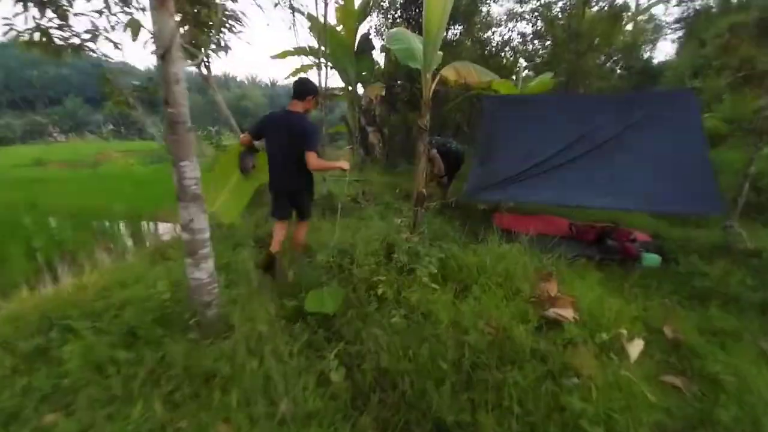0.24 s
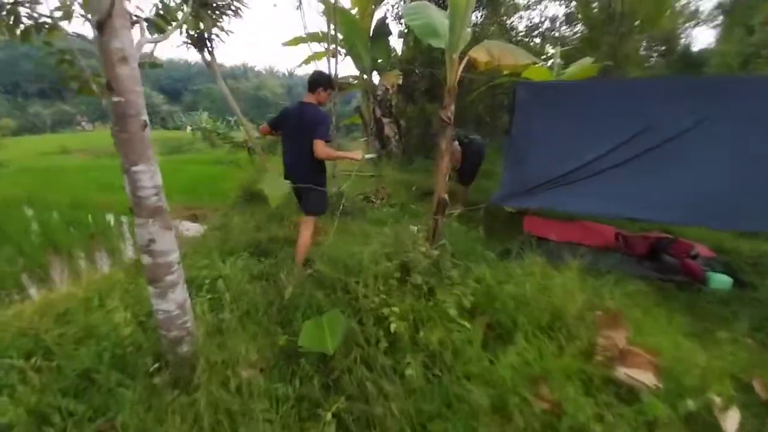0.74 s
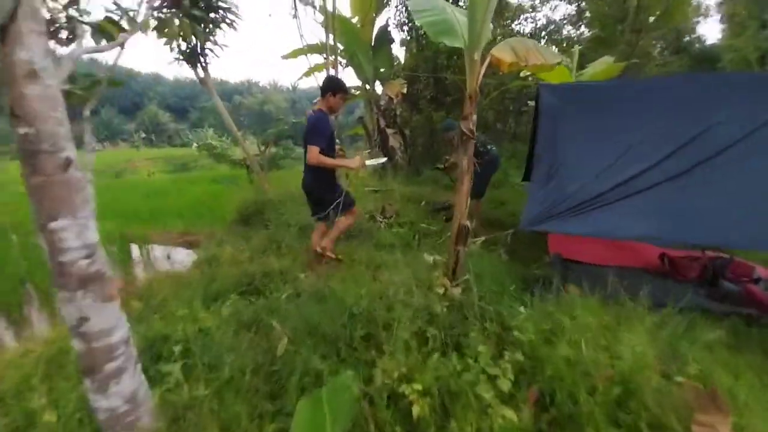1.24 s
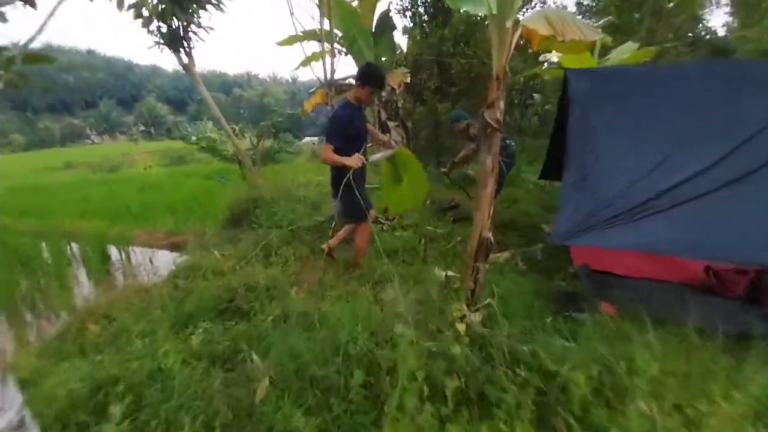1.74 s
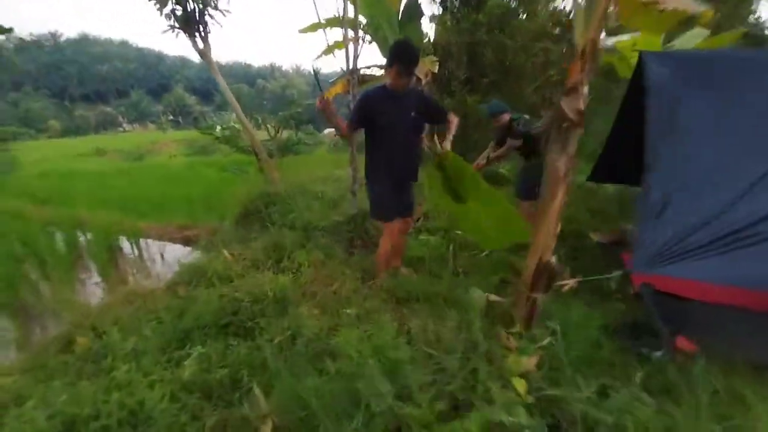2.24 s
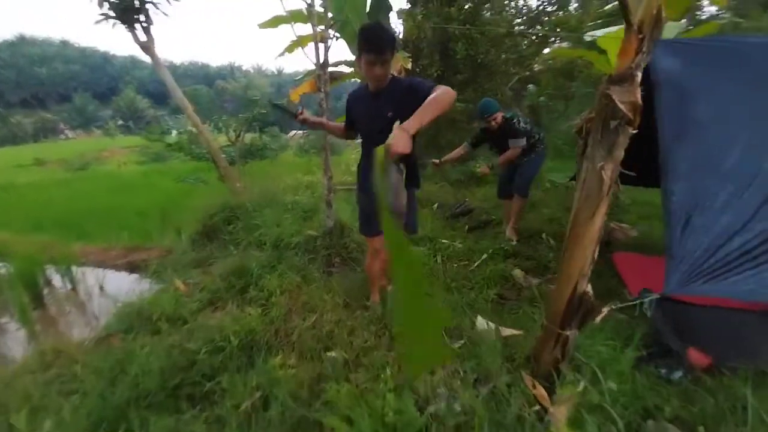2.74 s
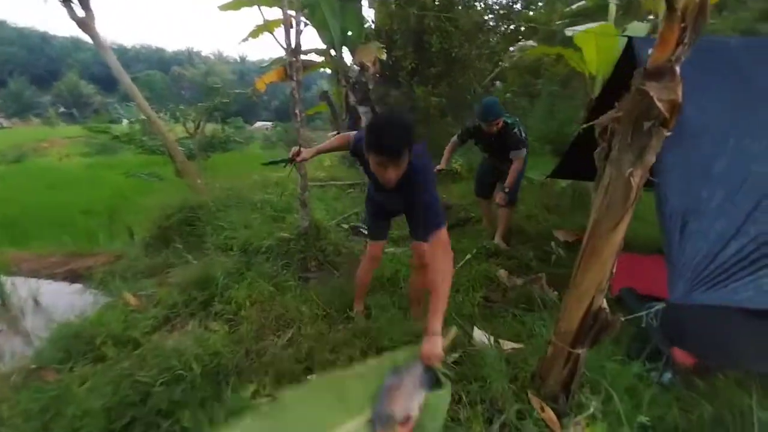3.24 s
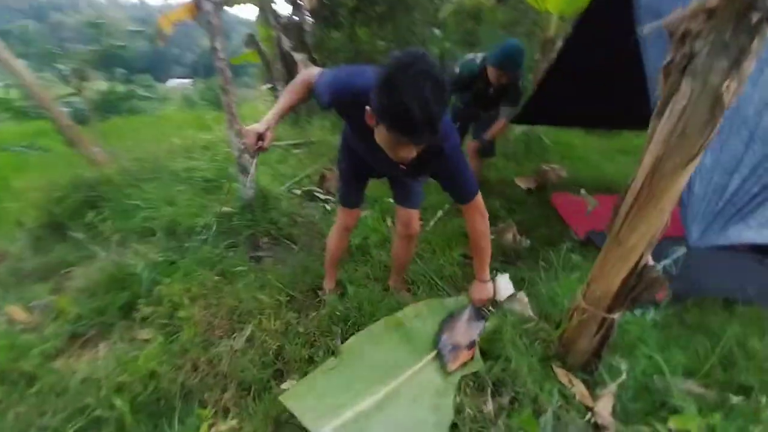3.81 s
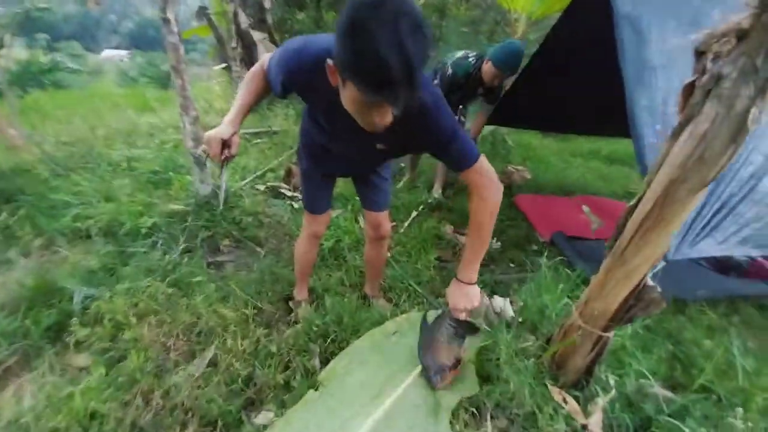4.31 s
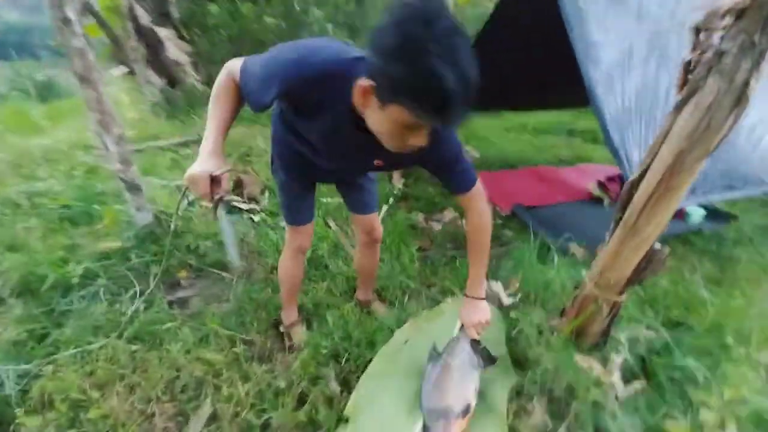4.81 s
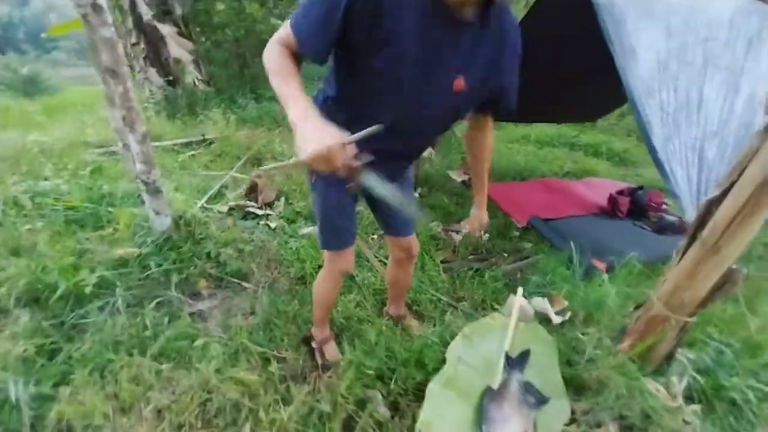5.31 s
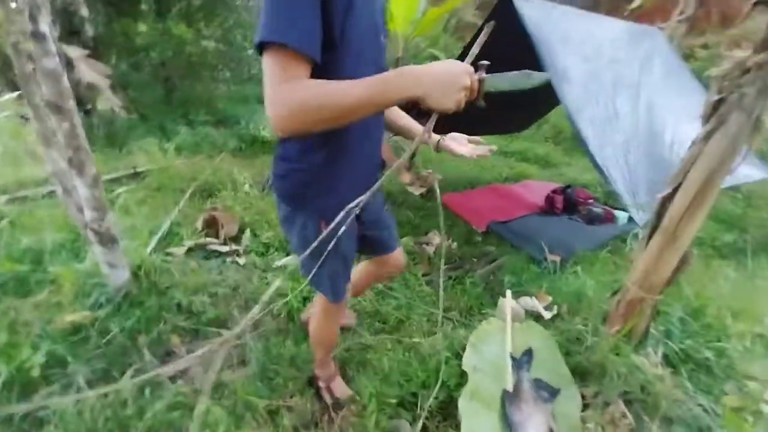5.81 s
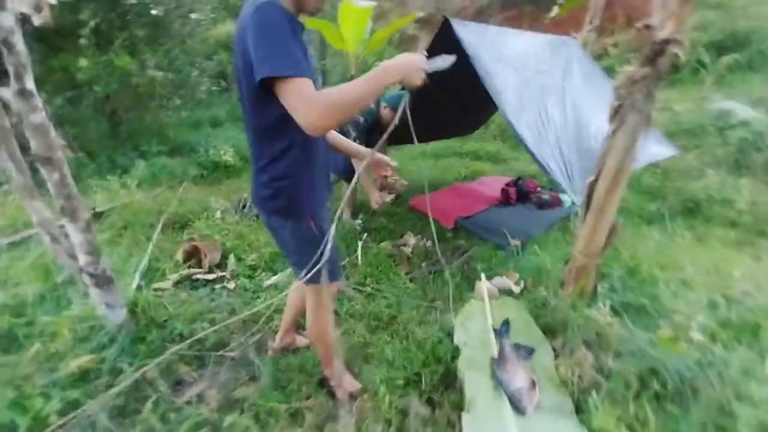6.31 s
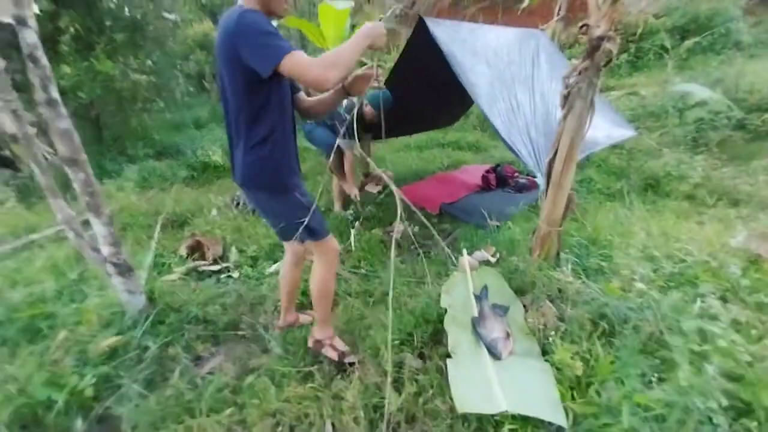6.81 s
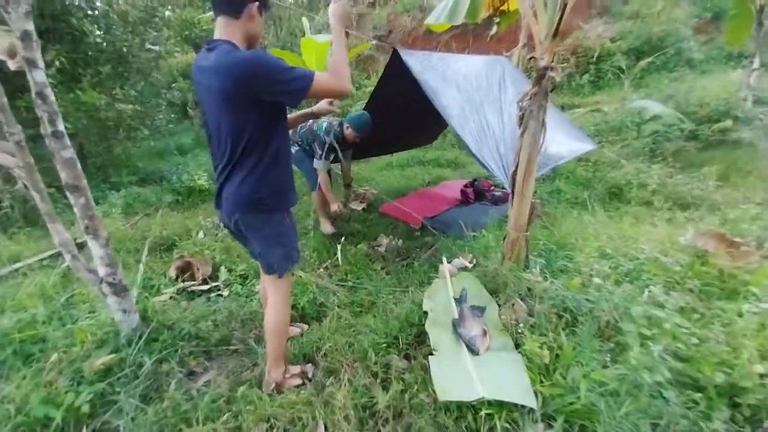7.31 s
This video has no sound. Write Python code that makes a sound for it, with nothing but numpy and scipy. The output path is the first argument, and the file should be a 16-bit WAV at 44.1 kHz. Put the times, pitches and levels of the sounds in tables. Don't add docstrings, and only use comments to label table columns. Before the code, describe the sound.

Bright grassy rustling and soft footfalls outdoors, crisp blade chops, a heavy leafy thud with scraping and snapping, over a quiet low valley hum.

```python
import sys
import numpy as np
from scipy import signal
from scipy.fft import rfft, irfft, next_fast_len
from scipy.io import wavfile
from scipy.ndimage import uniform_filter1d

SR = 44100
rng = np.random.default_rng(int(sys.argv[2]) if len(sys.argv) > 2 else 0)


def store_wav(level_fs):
    pcm = np.round(np.clip(np.atleast_2d(level_fs), -1, 1) * 32767)
    wavfile.write(sys.argv[1], SR, pcm.T.astype(np.int16))


def ratio(d):
    e = np.asarray(d, float) / 20
    return 10 ** e


N = 333032

# (frequency [Hz], likeness [-1 to 1])
LIKENESS = [(60, 0.35), (130, 0.8), (290, 0.058), (640, -0.45), (1410, 0.55), (3100, -0.044),
            (6820, -0.029), (15000, 0.035)]
# (frequency [Hz], likeness [-1 to 1])
NEAR_LIKENESS = [(60, .9), (250, .98), (600, .96), (1200, .8), (3000, .55), (8000, .3), (15000, .2)]


def rms_one(x):
    return x / np.sqrt(np.mean(x ** 2) + 1e-20)


def in_time(rows):
    s, *columns = np.transpose(rows)
    return [np.interp(np.arange(N) / SR, s, c) for c in columns]


def at_hz(points, hz):
    points = np.array(points)
    return np.interp(np.log(hz), np.log(points[:, 0]), points[:, 1])


def drift(rate):
    step = 40
    r = np.exp(-2 * np.pi * step * rate / SR)
    draws = rng.standard_normal(N // step + 2002)
    slow = signal.lfilter([1], [1, -2 * r, r * r], draws)[2000:]
    return np.interp(np.arange(N) / step, np.arange(len(slow)), rms_one(slow))


def coloured(x, spectrum):
    size = next_fast_len(x.shape[-1] + 4096, real=True)
    log_gain = np.log(ratio(at_hz(spectrum, np.fft.rfftfreq(size, 1 / SR) + 1)))
    cepstrum = irfft(log_gain, size)
    cepstrum[1:size // 2] *= 2
    cepstrum[size // 2 + 1:] = 0
    response = np.exp(rfft(cepstrum))
    return irfft(rfft(x, size) * response, size)[..., :x.shape[-1]]


def to_ears(mid_side, likeness, lag_ms=0):
    # (frequency [Hz], left minus right [dB])
    tilt = [(60, -0.5), (240, -2.5), (950, -2.5), (3770, -0.5), (15000, -1.5)]
    size = next_fast_len(mid_side.shape[1], real=True)
    hz = np.fft.rfftfreq(size, 1 / SR) + 1
    alike = np.clip(at_hz(likeness, hz), -.95, .98)
    mid, side = rfft(mid_side, size)
    both = np.sqrt(1 + alike) * mid + np.sqrt(1 - alike) * side * [[1], [-1]]
    both = both * np.exp(-1j * np.pi * hz * lag_ms / 1000 * [[1], [-1]])
    both = both * ratio(at_hz(tilt, hz) * [[.5], [-.5]])
    return irfft(both, size)[:, :mid_side.shape[1]]


def rustle(spectrum, per_s, spread_db, share, patchy_db, flicker, likeness=LIKENESS):
    born = rng.random(N) < per_s * ratio(5 * drift(12)) / SR
    sizes = ratio(spread_db * np.minimum(rng.exponential(1, N), 4))
    grains = rms_one(signal.lfilter([1], [1, -.9], born * sizes))
    share = np.clip(share, 0, 1)
    gate = np.sqrt(1 - share + share * grains ** 2) * ratio(patchy_db * drift(flicker))
    noise = gate * rng.standard_normal((2, N))
    return rms_one(to_ears(coloured(noise, spectrum), likeness))


def add(out, s, sound, pan_db=0):
    at = round(s * SR)
    panned = sound * ratio([[pan_db / 2], [-pan_db / 2]])
    out[:, at:at + sound.shape[-1]] += panned[:, :N - at]


def near_noise(s, size):
    # (time [s], left lag [ms], left minus right [dB])
    worker = [(0, 0.091, 3.5), (2.1, 0.051, -3), (2.7, 0.12, 1), (4.8, -0.041, -4), (5.7, -0.064, -2),
              (7.55, -0.056, -1)]
    when, lag_ms, pan_db = np.transpose(worker)
    pan = ratio(np.interp(s, when, pan_db) * np.array([[.5], [-.5]]))
    return pan * to_ears(rng.standard_normal((2, size)), NEAR_LIKENESS, np.interp(s, when, lag_ms))


def band_round(hz, octaves):
    edges = np.clip(hz * 2 ** (octaves * np.array([-.5, .5])), 100, 15500)
    return signal.butter(2, edges, "band", fs=SR, output="sos")


def swells(rows):
    drop_db, roundness = 12, 1.54
    t, power = np.arange(0, N + 64, 64) / SR, 0
    for s, level_db, rise, fall in rows:
        gone = np.abs(t - s) / np.maximum(np.where(t < s, rise, fall), .005)
        power = power + ratio(2 * (level_db - drop_db * gone ** roundness))
    return np.interp(np.arange(N) / SR, t, power)


def valley_hum():
    # (frequency [Hz], density [dB per Hz])
    ground = [(38, -38.5), (65, 2), (123, 0), (172, -2), (217, -2), (238, -8), (291, -11.5), (350, -16.5),
              (460, -27), (770, -120)]
    # (time [s], level [dB])
    hum_levels = [(0, -46), (1.1, -46.5), (1.62, -53.5), (1.91, -44.5), (2.6, -49), (3.2, -51), (3.5, -39),
                  (3.76, -39), (4.29, -47.5), (4.9, -46.5), (5.13, -39), (5.3, -44.5), (7.1, -46.5),
                  (7.55, -50.5)]
    drone = rustle(ground, per_s=16, spread_db=-2.5, share=0.017, patchy_db=1.07, flicker=5,
                   likeness=NEAR_LIKENESS)
    return ratio(in_time(hum_levels)[0]) * drone


def wind():
    # (frequency [Hz], density [dB per Hz])
    flutter = [(13, -38), (22, -19), (48, -17), (75, -21), (98, -24), (160, -120)]
    # (time of peak [s], level [dB], rise [s], fall [s])
    gusts = [
        (.4, -49, .4, .25),
        (1.06, -42, 0.2, 0.38),
        (1.8, -49.5, 0.29, .9),
        (3.5, -52, .45, .5),
        (4.6, -56.5, .45, 0.44),
        (5.28, -55, .3, 1.3),
    ]
    calm_db = -61
    gain = np.sqrt(swells(gusts) + ratio(2 * calm_db))
    return gain * rustle(flutter, per_s=34, spread_db=-15.0, share=.05, patchy_db=1.0, flicker=4.3)


def engine():
    # (time [s], fifth exhaust order [Hz], level [dB])
    engine_course = [(1.5, 216, -68), (1.7, 215, -53.5), (2.5, 200, -56), (2.9, 220, -57.5),
                     (3.2, 222, -72), (4.1, 194, -89), (4.5, 191, -42.5), (4.8, 189, -47.5),
                     (5.3, 183, -47), (5.6, 206, -49.5), (5.75, 180, -60), (6.0, 187, -49), (6.4, 193, -58),
                     (6.75, 187, -58), (7.0, 165, -43), (7.2, 158, -50.5), (7.55, 190, -50)]
    # (multiple of the firing rate, level against the fifth [dB])
    orders = [(5, -0.5), (4, -15), (3, -10), (2, -17)]
    hz, level_db = in_time(engine_course)
    firing = 2 * np.pi * np.cumsum(hz / 5 * (1 + .008 * drift(6))) / SR
    out = np.zeros((2, N))
    for k, db in orders:
        out += ratio(level_db + db + 4.5 * drift(5.1)) * np.sin(round(k) * firing + np.array([[.3], [-.3]]))
    return out


def crickets():
    # (start [s], length [s], level [dB])
    chirps = [
        (.39, .07, -68),
        (.58, .1, -67),
        (1.12, .07, -66),
        (1.34, .1, -66),
        (4.0, .1, -63),
        (4.21, .1, -65),
        (4.665, .105, -66),
        (5.165, .105, -63),
    ]
    # (time [s], level [dB])
    trill = [(0, -64), (.6, -55), (1.4, -61), (3.2, -58), (4.8, -68), (5.5, -78), (7.55, -78)]
    strokes_per_s, stroke_hz = 29, (4950, 4350)
    trill_hz, trill_per_s = 6850, 14
    sides = np.array([[.6], [-.6]])
    out, t = np.zeros((2, N)), np.arange(N) / SR
    for s, length, level_db in chirps:
        stroke = np.arange(round(length * SR)) / SR * strokes_per_s % 1
        phase = 2 * np.pi * np.cumsum(np.interp(stroke, [0, 1], stroke_hz)) / SR
        rough = uniform_filter1d(rng.standard_normal((2, len(stroke))), size=60) * np.sqrt(60)
        rasp = 1 + 0.85 * rough
        add(out, s, ratio(level_db + 6.0) * rasp * np.sin(np.pi * stroke) * np.sin(phase + sides))
    throb = np.maximum(np.sin(2 * np.pi * trill_per_s * t - 0.2), 0)
    phase = 2 * np.pi * np.cumsum(trill_hz + 45 * drift(78)) / SR
    return out + ratio(in_time(trill)[0] - 2.0) * throb * np.sin(phase + sides)


def wading():
    # (time of peak [s], blade
    # hiss [dB], stalks against hiss [dB], rise [s], fall [s])
    leg_sweeps = [(.07, -42, -12, 0.15, 0.09), (.24, -42, -8.5, 0.13, 0.2), (.36, -45.5, -5, 0.11, 0.066),
                  (.78, -44, -9.5, .13, 0.19), (.99, -34, -10, 0.076, .14), (1.53, -47.5, -9.5, 0.098, 0.053),
                  (1.71, -41.5, -6.5, .08, 0.16), (1.82, -45.5, -5.5, 0.084, 0.13),
                  (2.05, -45.5, -28, 0.067, 0.31), (2.295, -50.5, -8, 0.064, .06), (2.5, -37.5, -8, .12, 0.13),
                  (2.72, -47, -10.5, 0.094, 0.38), (3.21, -46.5, -11.5, 0.12, 0.086),
                  (4.41, -42.5, -17, 0.048, 0.16), (4.55, -39.5, -6, .16, 0.079),
                (5.465, -34.5, -15.5, 0.081, 0.14), (5.585, -36.5, -10.5, 0.11, 0.09),
                (5.76, -37.5, -9, 0.09, 0.14), (5.855, -36.5, -12.5, 0.12, 0.06),
                (6.05, -43.5, -8.5, 0.19, .2), (6.24, -35.5, -9, .1, .08), (6.4, -52.5, -2.5, 0.18, 0.12),
                (6.662, -54, -10.5, 0.081, 0.22), (6.93, -48, -8.5, .14, 0.29),
                (7.37, -46.5, -8, 0.17, 0.094), (7.52, -53, -10, .12, .2)]
    # (time of peak [s], leaf [dB], stalks against leaf [dB], rise [s], fall [s])
    drags = [(1.02, -43, -6, 0.02, 0.059), (1.22, -60.5, -8, 0.091, 0.12), (2.15, -59, 4.5, 0.23, 0.086),
             (3.295, -40, -5, 0.019, .04), (3.372, -26, -5, 0.046, 0.07), (3.43, -32, -3, .03, .06),
             (3.53, -42.5, 7, 0.23, 0.16), (3.68, -36, 0, 0.13, 0.13), (3.829, -37.5, -0.5, 0.11, 0.13),
             (3.97, -43.5, -2.5, 0.24, 0.16), (4.4, -58, -13, 0.16, 0.46), (4.94, -42, -12.5, 0.0094, .025),
             (4.99, -40, -5, .03, .03), (5.04, -30, -5.5, 0.046, 0.05), (5.085, -34, -3.5, 0.056, 0.043),
             (5.16, -46, -3.5, 0.14, 0.21), (5.73, -52.5, -12, 0.19, 0.13), (6.2, -49, -12, 0.087, .12),
             (6.5, -57, -6, 0.08, 0.08), (6.93, -56.5, -8, 0.1, 0.13), (7.37, -53.5, -10, .1, 0.15)]
    still_db = (-55.5, -65.5, -68.5)
    leaves_db, hiss_db = -12, -1.5
    legs, leaf = np.array(leg_sweeps).T, np.array(drags).T
    lead = [swells(zip(s, db, rise, fall)) for s, db, _, rise, fall in (legs, leaf)]
    stalks = [swells(zip(s, db + more_db, rise, fall)) for s, db, more_db, rise, fall in (legs, leaf)]
    powers = (lead[0] + stalks[1] * ratio(2 * hiss_db),
              stalks[0] + stalks[1],
              lead[1] + stalks[0] * ratio(2 * leaves_db))
    return [np.sqrt(p + ratio(2 * db)) for p, db in zip(powers, still_db)]


def grass_hiss(gain):
    # (frequency [Hz], density [dB per Hz])
    blades = [(1760, -21.5), (3000, -1.5), (3120, -2.5), (4970, 0.5), (5610, -1), (6080, -1), (7550, 1),
              (8460, -5), (12300, 3.5), (15000, -2)]
    return gain * rustle(blades, per_s=2700, spread_db=15.0, share=0.099, patchy_db=1.6, flicker=10.7)


def stalk_rustle(gain):
    # (frequency [Hz], density [dB per Hz])
    stalk_colour = [(530, -22), (900, -5.5), (1080, -6.5), (1170, -4), (1660, -3.5), (2250, -5),
                    (5500, -12.5), (7150, -57), (12100, -120)]
    return gain * rustle(stalk_colour, per_s=1200, spread_db=1.5, share=0.25, patchy_db=1.2, flicker=69)


def leaf_drag(gain):
    # (frequency [Hz], density [dB per Hz])
    leaf_colour = [(140, -34), (230, 0.5), (376, -10.5), (501, -3.5), (630, -3), (825, -9), (1100, -17.5),
                   (1430, -65), (2420, -120)]
    return gain * rustle(leaf_colour, per_s=380, spread_db=3.5, share=0.15, patchy_db=1.5, flicker=31,
                         likeness=NEAR_LIKENESS)


def gliding_tones(rows, rough):
    out = np.zeros((2, N))
    for s, length, from_hz, to_hz, level_db in rows:
        x = np.linspace(0, 1, round(length * SR))
        noise = rng.standard_normal((2, len(x)))
        rasp = 1 + rough * uniform_filter1d(noise[0] + .5 * noise, size=130) * np.sqrt(104)
        tone = np.sin(2 * np.pi * np.cumsum(from_hz + (to_hz - from_hz) * x) / SR)
        add(out, s, ratio(level_db) * np.sin(np.pi * x) * rasp / np.hypot(1, rough) * tone)
    return out


def swung_stick():
    # (start [s], length [s], from pitch [Hz], to pitch [Hz], level [dB])
    swings = [
        (2.28, .13, 2950, 3450, -59),
        (2.28, .08, 1330, 1370, -59),
    ]
    return gliding_tones(swings, rough=.6)


def rubbed_midrib():
    # (start [s], length [s], from pitch [Hz], to pitch [Hz], level [dB])
    rubs = [(0.0, .12, 1250, 1150, -56), (.17, .1, 1950, 2000, -57), (.3, .07, 1050, 1100, -51),
            (3.43, .25, 1180, 1130, -39), (3.58, .16, 1650, 1550, -41), (3.64, .14, 760, 800, -40),
            (1.6, .12, 2000, 2050, -53), (4.99, .1, 1400, 1400, -42), (6.42, .14, 1450, 2100, -57),
            (6.43, .12, 1100, 1400, -56), (5.93, .07, 750, 750, -56), (1.77, .08, 1000, 950, -53)]
    return gliding_tones(rubs, rough=5)


def footfalls():
    # (time of peak [s], level [dB], soil pitch [Hz], length [s])
    steps = [(0.299, -42, 103.4, .3), (0.497, -38.5, 97, 0.095), (0.764, -32, 104, 0.058),
             (1.048, -35, 106.6, 0.078), (2.516, -36.5, 89.8, 0.16), (3.986, -37, 93.4, 0.056),
             (4.293, -35, 103, 0.066), (4.527, -33.5, 100.4, 0.16), (5.246, -29.5, 103.5, 0.095),
             (5.737, -33, 105, 0.1), (5.966, -30.5, 124, 0.0242), (6.03, -39, 136.7, 0.1),
             (6.495, -38, 134, 0.089), (7.113, -42, 95.2, .15)]
    out = np.zeros((2, N))
    for s, level_db, hz, length in steps:
        x = np.linspace(-1, 1, round(length * 1.58 * SR))
        phase = 2 * np.pi * np.cumsum(hz * (1 - 0.016 * x)) / SR
        thud = np.cos(np.pi * x / 2) ** 2 * np.sin(phase + np.array([[.25], [-.25]]))
        add(out, max(s - length * .8, 0), ratio(level_db) * thud, -1.2)
    return out


def ticks():
    # (time [s], peak [dB], pitch [Hz], width [octaves])
    contacts = [(.759, -38, 7700, 1), (.8084, -35, 7600, 1), (.9082, -39, 2800, 1), (1.547, -42, 600, 2),
                (1.6495, -37, 2070, 1), (1.682, -38, 1300, 1), (1.9333, -38, 2800, 1.5),
                (2.4212, -38, 3500, 1), (5.3108, -41, 1500, 1), (5.3427, -43, 2000, 1),
                (5.599, -30, 1000, 2.5), (5.628, -35, 1500, 2), (5.7572, -19, 1500, 4),
                (1.0262, -24, 800, 2), (.9968, -29, 1200, 2), (2.0485, -27, 8000, 1.5),
                (3.4235, -20, 1500, 3), (3.4335, -24, 900, 2), (3.476, -26, 1200, 2),
                (4.9362, -25, 700, 2.5), (5.083, -22, 1500, 3), (6.042, -34, 900, 3),
                (6.1524, -36, 1300, 1.5), (6.179, -36, 600, 1.5), (6.198, -35, 2300, 1),
                (6.252, -36, 700, 1.5), (6.5016, -43, 1850, 1), (6.6952, -41, 3800, 1.5),
                (6.7765, -42, 1800, 1.5), (6.928, -38, 700, 1.5), (7.021, -38, 1050, .5),
                (3.8335, -26, 700, 2), (7.352, -30, 350, 1.5)]
    out, impulse = np.zeros((2, N)), signal.unit_impulse(SR // 20)
    for s, peak_db, hz, octaves in contacts:
        tick = signal.sosfilt(band_round(hz, octaves), impulse)
        add(out, s, ratio(peak_db) * tick / np.abs(tick).max(), -1.5)
    return out


def knocks():
    # (time [s], peak [dB], pitch [Hz])
    dull_knocks = [(0.998, -23, 737), (1.024, -16, 640), (1.06, -33, 171), (1.171, -29.5, 175),
                   (3.295, -22.5, 203), (3.349, -9, 186), (3.366, -9.5, 550), (3.379, -12, 480),
                   (3.377, -10, 175), (4.952, -27, 190), (5.009, -26, 254), (5.028, -19, 290),
                   (5.046, -13.5, 646), (5.078, -19, 270)]
    # (time [s], peak [dB], pitch [Hz], time to fall 60 dB
    # [s])
    more_knocks = [
        (1.024, -22.5, 335, 0.037),
        (1.0251, -22, 1205, .04),
        (1.003, -30, 1200, .03),
        (1.003, -30, 330, .03),
        (3.3598, -10, 190, .1),
        (3.385, -16, 480, .05),
        (1.045, -28, 624, 0.22),
        (3.364, -6, 513, 0.035),
        (4.9362, -13, 275, 0.021),
    ]
    knock_t60_s = 0.052
    blows = [(*row, knock_t60_s) for row in dull_knocks] + more_knocks
    luck = rng.standard_normal((len(blows), 4))
    ratios = np.array([[1], [.62], [1.45], [2.3]])
    mode_db = np.array([[0], [-8], [-11], [-12]])
    out, t = np.zeros((2, N)), np.arange(SR // 4) / SR
    for (s, peak_db, hz, t60), draw in zip(blows, luck):
        modes = ratio(mode_db + 2.8 * draw[:, None] - 60 * t * ratios ** .5 / t60)
        blow = np.sum(modes * np.sin(2 * np.pi * hz * ratios * t), axis=0)
        blow = blow * np.minimum(t / 0.0019, 1)
        add(out, s, ratio(peak_db - 5.0) * blow / np.abs(blow).max(), -1.0)
    return signal.sosfilt(signal.butter(4, 150, "high", fs=SR, output="sos"), out)


def snaps():
    # (time [s], peak [dB], pitch [Hz])
    twigs = [
        (1.5509, -33.5, 5260),
        (3.3455, -21, 4480),
        (3.8003, -27, 6000),
        (3.8233, -21.5, 5070),
        (5.015, -28, 7590),
        (5.0793, -20.5, 6350),
        (6.557, -35, 4500),
        (7.0758, -30, 5870),
    ]
    # (time [s], peak [dB], pitch [Hz])
    straws = [
        (0.8314, -31.5, 7620),
        (2.0485, -28, 12000),
        (2.6, -27, 7700),
        (2.6852, -22, 10800),
        (3.3198, -21.5, 9920),
        (3.9006, -23, 10500),
    ]
    # (time [s], peak [dB], pitch [Hz], width [octaves])
    stems = [(0.369, -29, 1520, 1.1), (0.384, -32, 1270, 1.2), (0.9968, -24.5, 1290, 1.9),
             (1.0242, -26, 1150, 0.33), (2.5748, -25, 2400, 1.46), (3.4226, -18.5, 950, 1),
             (3.833, -25, 1240, 0.92), (4.9362, -30, 800, 1.6), (5.0815, -20.5, 940, 0.99),
             (5.2902, -37.5, 1940, 0.45), (5.7566, -26, 2430, 2.7), (6.0411, -30.5, 1440, 3.4),
             (6.473, -43, 1400, 1.2), (0.2, -40, 2000, .5), (6.927, -38, 1500, 2.8),
             (7.0189, -36.5, 2000, 3), (7.3499, -23.5, 1760, 1.3)]
    # (time [s], peak [dB], pitch [Hz], width [octaves], decay
    # [ms])
    cut_ends = [
        (2.6975, -17, 1660, 0.8, 3),
        (7.316, -20, 2190, 2.9, 9.2),
        (2.6692, -29, 3000, 1.8, 1.2),
        (4.826, -29, 450, 2, 3),
        (2.7, -36, 600, 1.5, 5),
        (4.8399, -24, 2000, 1.2, 4),
        (2.696, -13, 4500, .6, 3),
        (2.071, -19, 3000, .8, 5),
        (7.256, -20, 1500, .7, 8),
    ]
    dry_octaves = 0.98
    twig_ms, straw_ms, stem_ms = 2.4, 1.6, 4.3
    tick_db = 9
    breaks = [(*row, dry_octaves, twig_ms) for row in twigs]
    breaks += [(*row, dry_octaves, straw_ms) for row in straws]
    breaks += [(*row, stem_ms) for row in stems] + cut_ends
    out, t = np.zeros((2, N)), np.arange(SR // 10) / SR
    for s, peak_db, hz, octaves, decay_ms in breaks:
        fade = np.exp(-t * 1000 / decay_ms) + ratio(tick_db) * np.exp(-t / .0002)
        click = signal.sosfilt(band_round(hz, octaves), near_noise(s, len(t)) * fade)
        add(out, s, ratio(peak_db + 1.0) * click / np.abs(click).max())
    return out


def chops():
    # (time [s], peak [dB], low edge [Hz], crack decay [ms], tail [dB])
    strokes = [
        (2.0705, -12.5, 2600, 1.5, -14.5),
        (2.6957, -4.5, 1900, 1.24, -22),
        (4.8237, -6.5, 2000, 5.3, -11.5),
        (7.2544, -11, 600, 11, -6),
        (7.2612, -18, 604, 5.4, -7),
        (7.2704, -13, 600, 1.9, -20),
    ]
    # (frequency [Hz], density [dB per Hz])
    chop_colour = [(240, -60), (400, -11), (1350, -5), (2200, -2), (3200, -2), (4600, 2), (8820, -4),
                   (12500, -1), (15000, -4.5)]
    settle_t60_s = 0.22
    out, t = np.zeros((2, N)), np.arange(SR // 2) / SR
    for s, peak_db, low_hz, crack_ms, tail_db in strokes:
        thin = signal.butter(1, low_hz, "high", fs=SR, output="sos")
        noise = near_noise(s, len(t))
        crack = noise * np.exp(-t * 1000 / crack_ms)
        leaves = signal.sosfilt(thin, noise) * ratio(tail_db - 60 * t / settle_t60_s)
        blow = (crack + leaves) * np.minimum(t / 0.00092, 1)
        blow = signal.sosfilt(thin, coloured(blow, chop_colour))
        add(out, s, ratio(peak_db + 5.5) * blow / np.abs(blow).max())
    return out


def outdoors(x):
    # (delay [s], level [dB])
    echoes = [(.0045, -14), (.011, -18), (.018, -21)]
    out = x.copy()
    for delay, level_db in echoes:
        add(out, delay, ratio(level_db) * x[::-1])
    return out


def scene():
    hiss_gain, stalk_gain, leaf_gain = wading()
    background = valley_hum() + wind() + engine() + crickets()
    plants = grass_hiss(hiss_gain) + stalk_rustle(stalk_gain) + leaf_drag(leaf_gain)
    tones = swung_stick() + rubbed_midrib()
    blows = footfalls() + ticks() + knocks() + outdoors(snaps() + chops())
    return background + plants + tones + blows


def roll_off(x):
    return signal.sosfilt(signal.butter(12, 16640, fs=SR, output="sos"), x)


def record(dry):
    rounded = 1.5 * np.tanh(dry / 1.5)
    top = signal.ellip(6, .5, 55, 15550, fs=SR, output="sos")
    rumble_cut = signal.butter(2, 37, "high", fs=SR, output="sos")
    finished = signal.sosfilt(np.vstack([top, rumble_cut]), rounded)
    return roll_off(finished)


dry = scene()
out = record(dry)
store_wav(out)
```